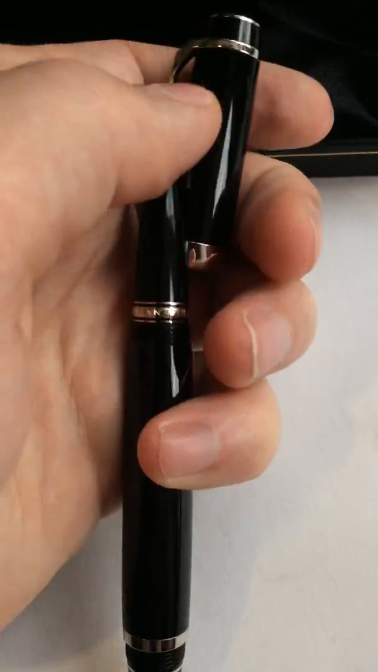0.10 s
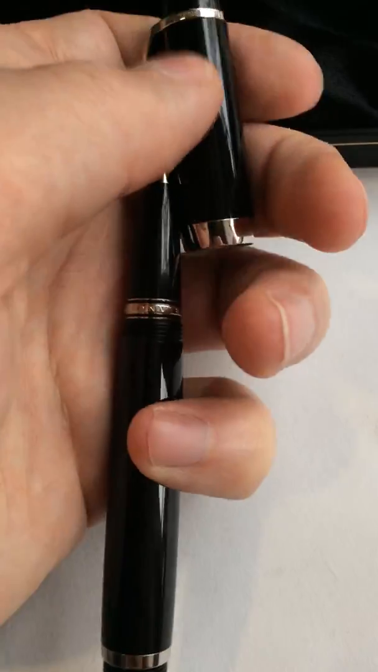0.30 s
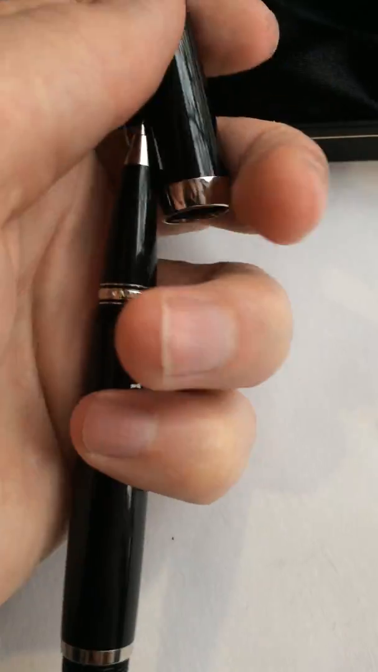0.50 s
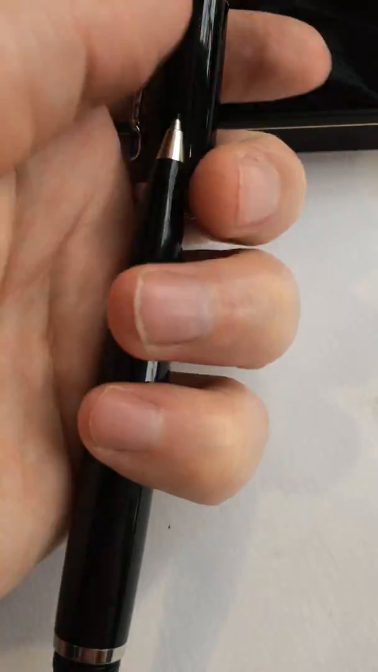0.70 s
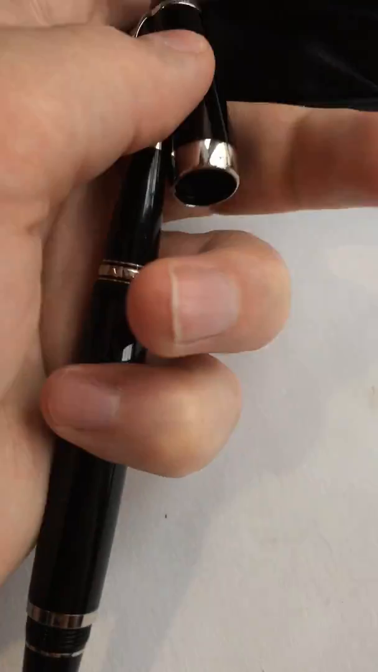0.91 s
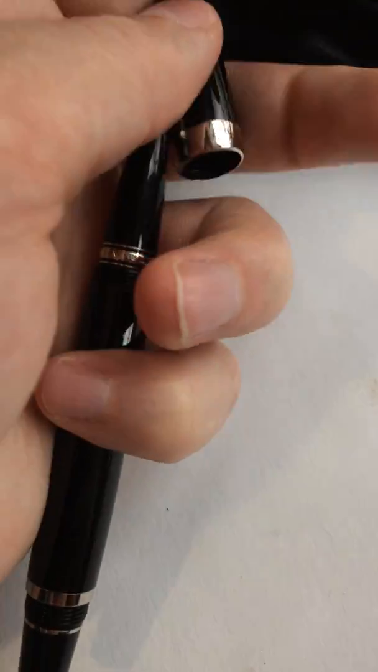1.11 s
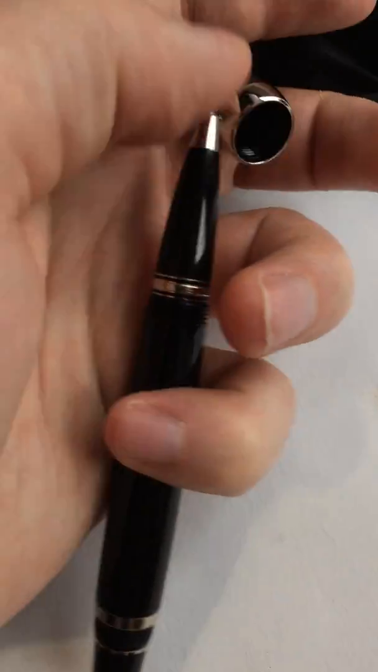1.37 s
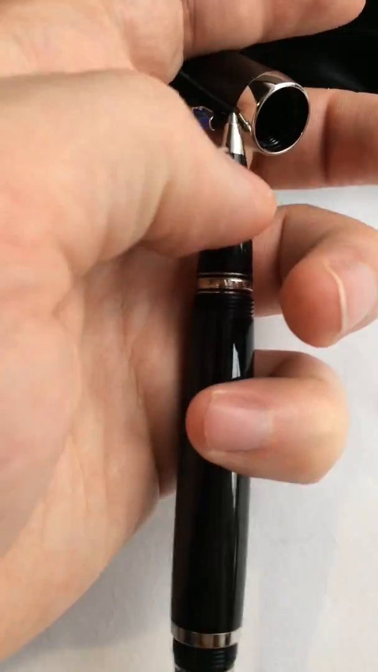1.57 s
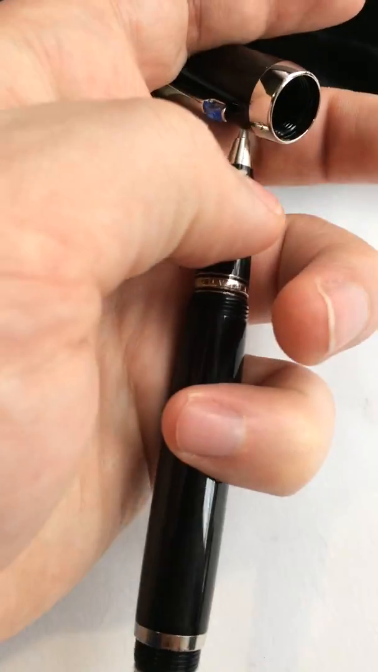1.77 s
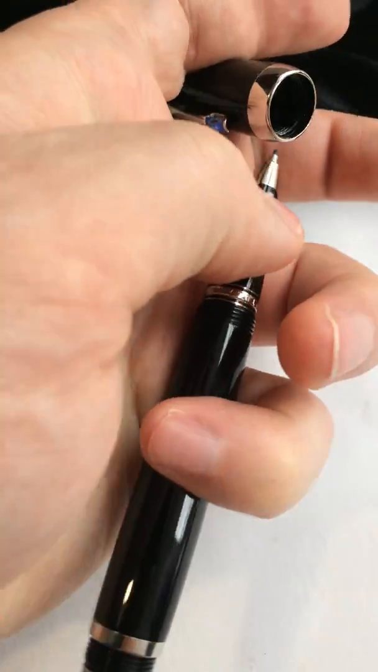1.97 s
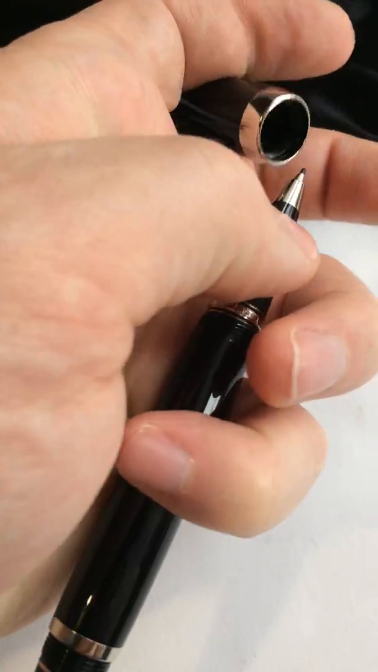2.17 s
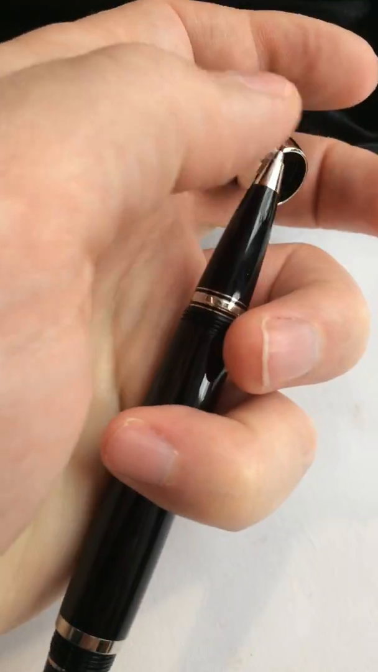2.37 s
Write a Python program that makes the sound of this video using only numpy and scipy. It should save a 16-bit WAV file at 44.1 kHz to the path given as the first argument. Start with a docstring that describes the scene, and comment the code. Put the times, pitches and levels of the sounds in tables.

```python
"""In a quiet room, a hand turns a resin pen and its metal-trimmed cap close to the microphone.
The cap clacks and chatters to rest, its rim and clip tick, the barrel is tapped, the tip knocks on the cap.
Each contact is a short burst of noise plus quickly fading tones; fine scratches catch the sliding cap.
Fingers rub with filtered noise full of tiny snaps, and grip shifts make low noise bumps.
An appliance hums as a few wavering tones, over steady room rumble and microphone hiss."""
import sys
import numpy as np
from scipy import signal
from scipy.fft import rfft, irfft
from scipy.io import wavfile

SR = 44100
rng = np.random.default_rng(int(sys.argv[2]) if len(sys.argv) > 2 else 0)


def dump(signal):
    """Clip the signal to [-1, 1] and save it as 16-bit WAV at the path in sys.argv[1]."""
    limited = np.clip(np.atleast_2d(signal).T, -1, 1)
    pcm = np.round(limited * 32767).astype(np.int16)
    wavfile.write(sys.argv[1], SR, pcm)


N = 110250
TIME = np.arange(N) / SR   # seconds
CUTOFF_HZ = 16000   # top of the contact cracks and of the whole sound
ROOM_T60_S, ROOM_TOP_HZ = 0.15, 10040   # time for the room sound to fall 60 dB; its upper edge


def from_db(db):
    """Turn decibels into a factor for the wave's height."""
    return 10 ** (np.asarray(db) / 20)


def rms_one(x):
    """Scale a sound to an average strength (rms) of 1."""
    return x / np.sqrt(np.mean(x ** 2) + 1e-20)


def band(x, low_hz, high_hz, order=2):
    """Keep mainly the pitches between two edges."""
    sos = signal.butter(order, [low_hz, high_hz], "band", fs=SR, output="sos")
    return signal.sosfilt(sos, x)


def drift(rate_hz):
    """Wander smoothly at random, with spread 1, by weakening noise above the given rate."""
    spectrum = rfft(rng.standard_normal(N))
    hz = np.fft.rfftfreq(N, 1 / SR)
    return rms_one(irfft(spectrum / (1 + (hz / rate_hz) ** 2), N))


def dying_noise(t60_s):
    """Half a second of noise that fades by 60 dB in the given time."""
    t = TIME[:SR // 2]
    return rng.standard_normal(len(t)) * np.exp(-np.log(1000) * t / t60_s)


def clicks_at(start_s, level_db):
    """Place one single-sample click for each time and strength."""
    return np.bincount((start_s * SR).astype(int), from_db(level_db), N)[:N]


def ring(clicks, hz, t60_s):
    """Each click starts a fading sine, like a struck object; a click of 1 starts it at height 1."""
    shrink = np.exp(-np.log(1000) / (t60_s * SR))   # per sample
    turn = 2 * np.pi * hz / SR   # radians per sample
    feedback = [1, -2 * shrink * np.cos(turn), shrink * shrink]
    return signal.lfilter([0, np.sin(turn)], feedback, clicks + 1e-18)


SPREAD_S, STRIKE_VARIES_DB = 0.0002, 2   # longest delay before a tone starts; change from blow to blow
CRACK_T60_S, CRACK_LOW_HZ = 0.0074, 2700
SCATTER_LOW_HZ = 1700   # lower edge of the wash that follows a contact
MODE_REACH = 0.2   # each tone is kept within this share of its pitch, so it swells over a few cycles
# a weaker blow is duller: extra dB lost per dB of weakness and per octave above this pitch
SOFT_DULLS, SOFT_FROM_HZ = .05, 4000


def struck(hits, modes, crack_db, scatter_db):
    """A contact gives a brief crack, a faint wash in the room and tones that the fingers damp quickly."""
    start_s, strength_db = np.transpose(hits)
    crack = from_db(crack_db) * band(dying_noise(CRACK_T60_S), CRACK_LOW_HZ, CUTOFF_HZ)
    wash = from_db(scatter_db) * band(dying_noise(ROOM_T60_S), SCATTER_LOW_HZ, ROOM_TOP_HZ)
    out = signal.fftconvolve(clicks_at(start_s, strength_db), crack + wash)[:N]
    for k, (hz, level_db, t60_s) in enumerate(modes):
        lag_s = SPREAD_S * rng.random()
        dulling = 1 + SOFT_DULLS * max(np.log2(hz / SOFT_FROM_HZ), 0)
        variation_db = STRIKE_VARIES_DB * rng.standard_normal(len(start_s))
        blow_db = strength_db * dulling + level_db + variation_db
        tone = ring(clicks_at(start_s + lag_s, blow_db), hz, t60_s)
        tone = band(tone, hz / (1 + MODE_REACH), hz * (1 + MODE_REACH), order=1)
        out = out + (-1) ** k * tone   # every other tone starts upside down
    return out


# the cap meets the barrel and bounces ever faster: start_s [s], strength_db [dB]
CAP_HITS = [(.2002, 0), (.2084, -7.5), (.2126, -15.5), (.2153, -18), (.2175, -18.5), (.2193, -23.5),
            (.2210, -25)]
# tones of the cap: pitch_hz [Hz], level_db [dB, before filtering], t60_s [s to fall 60 dB]
CAP_TONES = [(1800, -29.5, .008), (2350, -35.5, .016), (3430, -27.5, .025), (3930, -16, .012),
             (4370, -24.5, .007), (4750, -34, .007), (5450, -28, .006), (5760, -26, .006),
             (6600, -28, .006), (7580, -28, .006), (7920, -27, .010), (8400, -37, .009),
             (9670, -18.5, .0075), (10050, -28, .006), (10650, -20, .007), (11500, -35, .006),
             (13300, -27.5, .0045), (15000, -33, .003)]


def cap():
    """The cap clacks on the barrel, and its shrinking bounces set it ringing again."""
    return struck(CAP_HITS, CAP_TONES, crack_db=-32, scatter_db=-57)


# the cap's metal rim strikes the barrel: start_s [s], strength_db [dB]
RIM_HITS = [(.3422, 2)]
# tones of the rim: pitch_hz [Hz], level_db [dB, before filtering], t60_s [s to fall 60 dB]
RIM_TONES = [(1380, -51, 0.0093), (1953, -48.5, 0.023), (2440, -51, .014), (3130, -47, 0.014),
             (3660, -42, .010), (5050, -37.5, 0.0073), (6000, -40, 0.0044), (7930, -30.5, .006),
             (9100, -29, 0.0065), (10900, -36.5, .005), (13900, -41, 0.0037), (15100, -40, .004)]


def rim():
    """The metal rim ticks on the barrel and rings briefly."""
    return struck(RIM_HITS, RIM_TONES, crack_db=-40.0, scatter_db=-72)


# ticks of the pocket clip: start_s [s], strength_db [dB]
CLIP_HITS = [(.2850, -15.5), (.4355, -0.5), (.8722, -21)]
CLIP_TONES = [(1918, -56, 0.0092), (3290, -49, 0.0073), (4030, -51, 0.01), (7080, -48.5, 0.0078),
              (7850, -43, 0.011), (8540, -44, 0.006), (9350, -52, 0.0097), (13200, -55, .003)]


def clip():
    """The springy pocket clip ticks with thin, short tones."""
    return struck(CLIP_HITS, CLIP_TONES, crack_db=-52, scatter_db=-77)


# the pen tip knocks on the cap: start_s [s], strength_db [dB]
TIP_HITS = [(1.6726, 0), (1.6771, -4), (1.6814, -18)]
# tones of the tip on the cap: pitch_hz [Hz], level_db [dB, before filtering], t60_s [s to fall 60 dB]
TIP_TONES = [(1740, -37.5, 0.0094), (2110, -60, 0.008), (2730, -53.5, 0.014), (3330, -47, .014),
             (3985, -39.5, 0.0089), (6400, -58, .009), (7610, -39, .0075), (7930, -41.5, 0.0073),
             (9800, -56, .007), (11300, -43, 0.0083), (11900, -44, .007), (14700, -48, 0.0061)]


def tip():
    """The metal tip knocks on the cap, giving tones with little crack."""
    return struck(TIP_HITS, TIP_TONES, crack_db=-68, scatter_db=-74)


# soft taps on the resin barrel: start_s [s], strength_db [dB]
BARREL_HITS = [(.6692, -12.5), (.7470, -16.5), (.7614, -7.5), (1.1217, 2.5), (1.1380, -10)]
# tones of the barrel: pitch_hz [Hz], level_db [dB, before filtering], t60_s [s to fall 60 dB]
BARREL_TONES = [(1400, -63, .007), (2000, -60.5, 0.02), (2680, -54.5, 0.0043), (3620, -53.5, 0.0045),
                (4300, -60, .005), (5550, -49, 0.0032), (6960, -58.5, 0.0047), (9300, -64, .004),
                (15200, -57, .004)]


def barrel():
    """Soft taps set the resin barrel ringing faintly."""
    return struck(BARREL_HITS, BARREL_TONES, crack_db=-61, scatter_db=-80)


# the cap catches in fine scratches as it slides on the barrel: start_s [s], strength_db [dB]
SCRATCH_HITS = [(.0562, -10), (.0628, -4), (.0655, -11), (.0705, -13), (.0845, -0.5), (.1022, -11),
                (.1115, -12)]
# tones of these catches: pitch_hz [Hz], level_db [dB, before filtering], t60_s [s to fall 60 dB]
SCRATCH_TONES = [(2800, -53, 0.0063), (3500, -57, .004), (6400, -53.5, 0.0033), (8600, -57, .003)]


def scratches():
    """Each catch of the sliding cap is a tiny contact with its own short tones."""
    return struck(SCRATCH_HITS, SCRATCH_TONES, crack_db=-59.5, scatter_db=-80.5)


def pen_parts():
    """Add all contacts and remove the bass, which such small parts cannot radiate."""
    knocks = cap() + rim() + clip() + tip() + barrel() + scratches()
    return signal.sosfilt(signal.butter(3, 1000, "high", fs=SR, output="sos"), knocks)


RUB_PEAKS_AT = 0.64   # share of the movement


def swell(start_s, length_s):
    """Loudness of one hand movement: it grows, peaks and stops."""
    corners_s = [start_s, start_s + RUB_PEAKS_AT * length_s, start_s + length_s]
    return np.sin(np.interp(TIME, corners_s, [0, 1, 0]) * np.pi / 2)


# snaps of the skin: average rate, spread of sizes, share of the rubbing power before filtering
SLIPS_PER_S, SLIP_SPREAD_DB, SLIP_SHARE = 900, 3.5, .5
# fingers slide over the parts:
# start_s [s], length_s [s], level_db [dB], centre_hz [Hz], width_octaves [octaves]
RUBS = [(0.037, 0.062, -68, 2880, 0.4), (0.039, 0.091, -73.5, 6944, 0.85), (0.087, 0.062, -71.5, 2620, 0.6),
        (.1, 0.2, -71.5, 7450, 1.6), (.72, 0.038, -77, 3100, .6), (.715, 0.066, -78.5, 11110, 0.42),
        (0.97, 0.041, -76, 12450, 0.38), (0.984, 0.032, -76.5, 7620, .15), (1.308, 0.086, -64, 1860, 0.68),
        (1.364, 0.022, -73, 2660, 0.54), (1.144, 0.44, -76, 1198, 0.76), (1.434, 0.067, -75, 12100, 0.33),
        (1.798, 0.019, -70.5, 3070, 0.35), (1.81, 0.048, -71.5, 2222, 0.98)]


def fingers():
    """Skin sticks and slips on the polished parts: tiny uneven snaps in a hiss under each stroke."""
    sizes = from_db(SLIP_SPREAD_DB * np.minimum(rng.exponential(1, N), 3))
    sizes = sizes * rng.choice([-1, 1], N)
    slips = rms_one(sizes * (rng.random(N) < SLIPS_PER_S / SR))
    friction = np.sqrt(SLIP_SHARE) * slips + np.sqrt(1 - SLIP_SHARE) * rng.standard_normal(N)
    out = np.zeros(N)
    for start_s, length_s, level_db, centre_hz, width_octaves in RUBS:
        half_width = 2 ** (width_octaves / 2)
        hiss = band(friction, centre_hz / half_width, centre_hz * half_width, order=1)
        out += from_db(level_db) * swell(start_s, length_s) * rms_one(hiss)
    return out


BUMP_LOW_HZ, BUMP_HIGH_HZ = 56.3, 109
# dull bumps as the grip shifts: start_s [s], length_s [s], level_db [dB]
BUMPS = [(0.919, .14, -71), (1.287, 0.067, -63)]


def bumps():
    """Low noise swells softly while the grip shifts."""
    rumble = rms_one(band(rng.standard_normal(N), BUMP_LOW_HZ, BUMP_HIGH_HZ))
    return rumble * sum(from_db(level_db) * swell(start_s, length_s)
                        for start_s, length_s, level_db in BUMPS)


DESK_DELAY_S, DESK_DB = .0025, -14.5   # reflection from the desk below the hand
ROOM_DELAY_S, ROOM_DB = 0.0034, -27


def room(x):
    """One reflection from the desk, then the faint, short reverberation of a small furnished room."""
    desk = from_db(DESK_DB) * np.interp(TIME - DESK_DELAY_S, TIME, x, left=0)
    tail = band(dying_noise(ROOM_T60_S), 200, ROOM_TOP_HZ)
    tail = tail * (TIME[:SR // 2] > ROOM_DELAY_S)
    tail = tail / np.sqrt(np.sum(tail ** 2))   # total energy 1
    return desk + from_db(ROOM_DB) * signal.fftconvolve(x, tail)[:N]


# spread of the level, spread of the phase in radians, and rate of the wandering
HUM_WAVER_DB, HUM_WAVER_RAD, HUM_WAVER_HZ = 1.83, 0.24, 2.3
# tones of the hum: pitch_hz [Hz], level_db [dB rms, before the waver]
HUM = [(147, -64), (253.5, -72.5), (297, -81.5), (442, -83.5), (501, -91), (672, -85.5), (800, -87)]


def hum():
    """An appliance hums: a few low tones waver slightly in level and phase."""
    out = np.zeros(N)
    for pitch_hz, level_db in HUM:
        height = np.sqrt(2) * from_db(level_db + HUM_WAVER_DB * drift(HUM_WAVER_HZ))
        phase = 2 * np.pi * (pitch_hz * TIME + rng.random())
        out += height * np.sin(phase + HUM_WAVER_RAD * drift(HUM_WAVER_HZ))
    return out


AIR_DB = -66.5   # overall rms level
# colour of the room noise: pitch_hz [Hz], level_db [dB per Hz, relative]
AIR = [(25, -25), (45, -7.5), (90, -4.5), (180, 1), (280, -8.5), (400, -11), (700, -16), (1200, -19.5),
       (2500, -22.5), (5000, -28), (10000, -29.5), (13000, -33), (16000, -41.5)]


def air():
    """Steady room rumble and microphone hiss, made by colouring noise."""
    pitch_hz, level_db = np.transpose(AIR)
    log_hz = np.log(np.fft.rfftfreq(N, 1 / SR) + 1)   # plus 1 avoids the log of zero
    colour = from_db(np.interp(log_hz, np.log(pitch_hz), level_db))
    return from_db(AIR_DB) * rms_one(irfft(rfft(rng.standard_normal(N)) * colour, N))


def scene():
    """Close handling sounds in the humming room, on one channel."""
    handling = pen_parts() + fingers()
    return (handling + room(handling) + bumps() + hum() + air())[None]


def record(dry):
    """Cut the top steeply."""
    return signal.sosfilt(signal.ellip(10, .2, 80, CUTOFF_HZ, fs=SR, output="sos"), dry)


dry = scene()
out = record(dry)
dump(out)
```